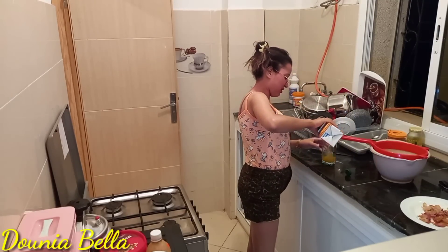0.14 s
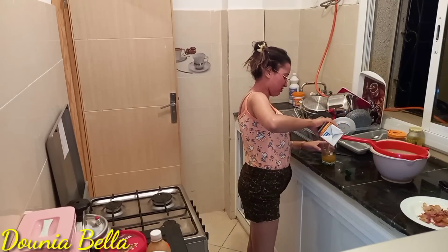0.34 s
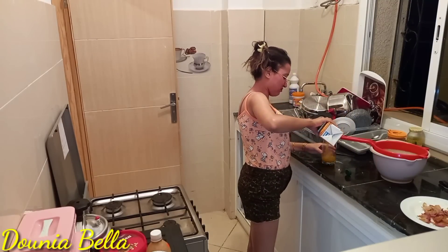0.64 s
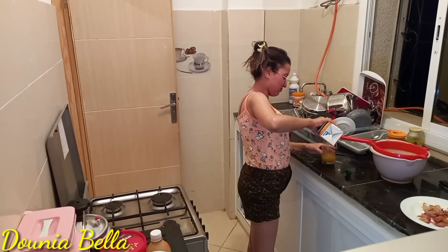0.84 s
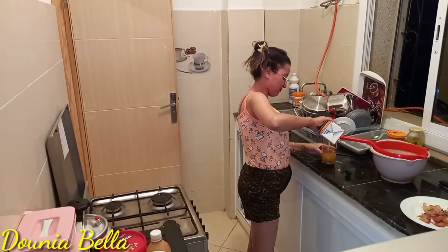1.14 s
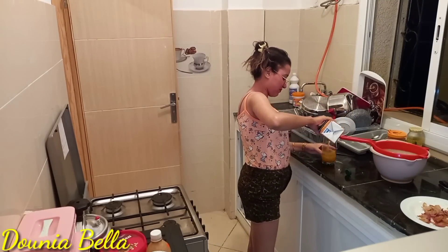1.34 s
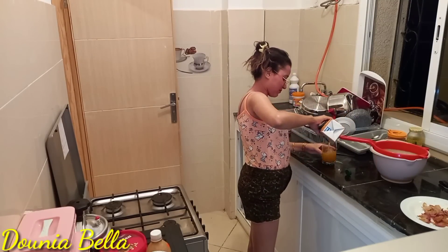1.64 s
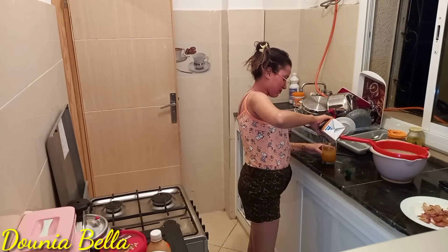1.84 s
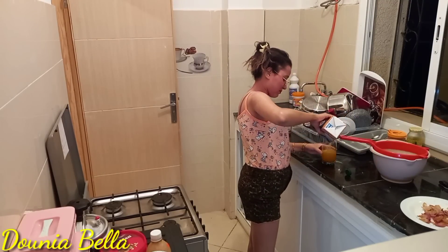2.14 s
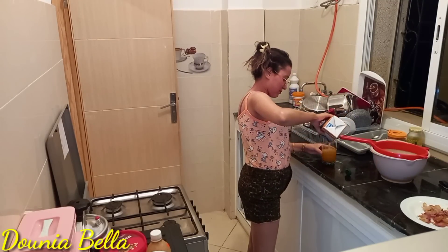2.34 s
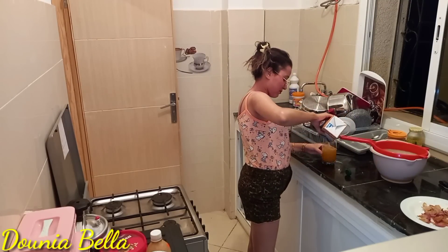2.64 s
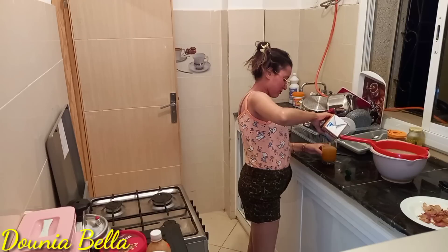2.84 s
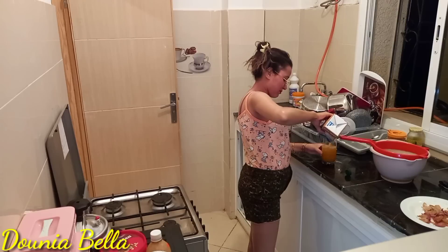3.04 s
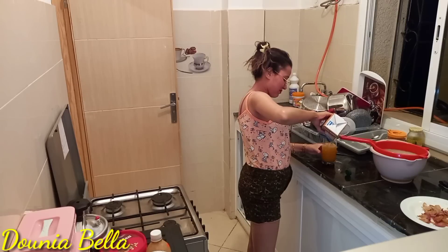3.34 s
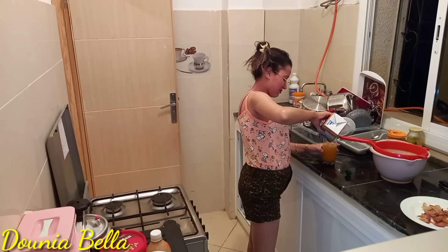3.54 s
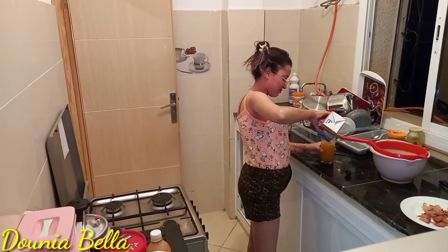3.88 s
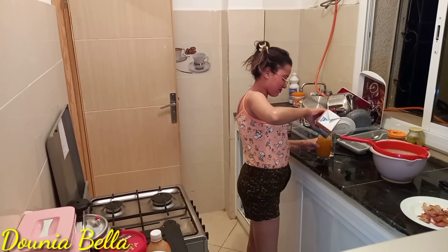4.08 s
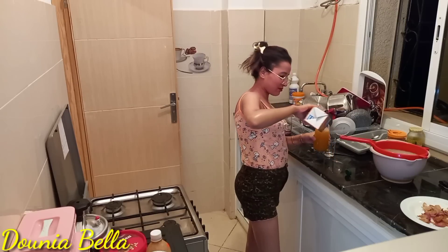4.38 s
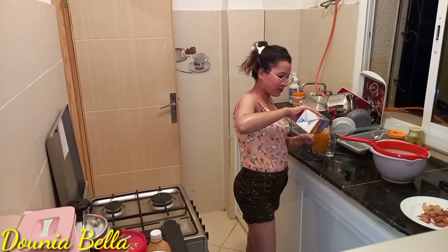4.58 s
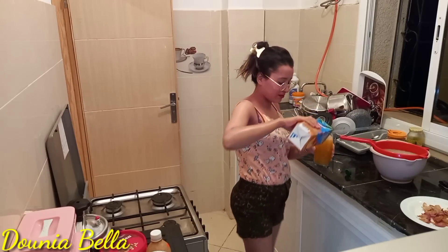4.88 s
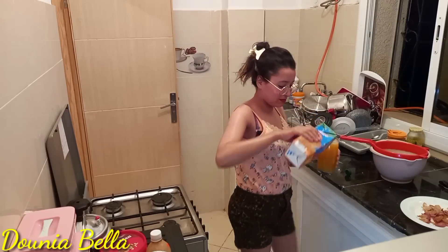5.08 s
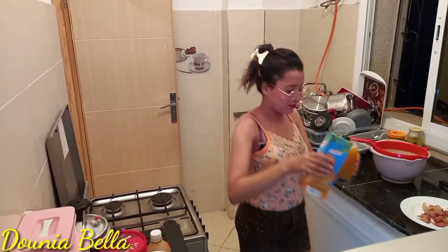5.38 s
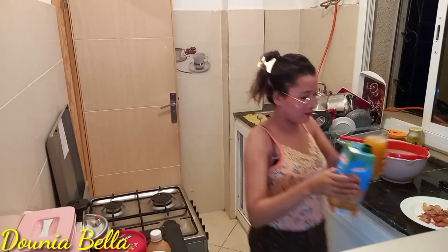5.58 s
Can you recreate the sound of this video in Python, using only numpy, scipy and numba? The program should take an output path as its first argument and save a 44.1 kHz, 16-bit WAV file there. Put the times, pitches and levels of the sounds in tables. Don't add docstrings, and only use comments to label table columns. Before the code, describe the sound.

Juice pours from a carton into a glass about two metres from a stereo microphone in a small tiled kitchen. Low hollow gulps, ringing glugs and bright bubbles tumble over fine splashing. The glass tone climbs as it fills; after about four seconds only stray plips, a slight carton creak and room hush with a faint fridge hum remain.

```python
import sys
import numpy as np
from scipy import signal
from scipy.fft import rfft, irfft, next_fast_len
from scipy.io import wavfile
from scipy.ndimage import uniform_filter1d
from numba import njit

SR = 44100
rng = np.random.default_rng(int(sys.argv[2]) if len(sys.argv) > 2 else 0)


def file_out(sig):
    cols = np.atleast_2d(sig).T
    lim = np.clip(cols, -1, 1)
    pcm = np.round(lim * 32767).astype(np.int16)
    wavfile.write(sys.argv[1], SR, pcm)


def how_loud(loudness_db):
    steps = np.asarray(loudness_db, float) / 20
    return 10 ** steps


N = 251976


def unit(x):
    return x / np.sqrt(np.mean(x ** 2))


def along_hz(table, hz):
    points, values = np.transpose(table)
    return np.interp(np.log(hz + 1), np.log(points + 1), values)


def level_db(table):
    s, db = np.transpose(table)
    return np.interp(np.arange(N) / SR, s, db)


def colour(x, gain_of_hz):
    size = next_fast_len(x.shape[-1], True)
    gain = gain_of_hz(np.fft.rfftfreq(size, 1 / SR))
    return irfft(rfft(x, size) * gain, size)[..., :x.shape[-1]]


def bell(f, hz, octaves):
    return np.exp(-(np.log2((f + 1) / hz) / octaves) ** 2)


def walk(rate_hz):
    k = int(SR / rate_hz)
    steps = np.repeat(rng.standard_normal(N // k + 1), k)
    return 1.3 * uniform_filter1d(uniform_filter1d(steps, k), k)[:N]


@njit
def ring(start_s, hz, cycles, size, glide, swell_cycles):
    out = np.zeros(N)
    for k in range(len(start_s)):
        period = SR / hz[k]
        length = cycles[k] * period
        first = int(start_s[k] * SR)
        phase = 0.
        for i in range(min(int(2 * length), N - first)):
            phase += 2 * np.pi * (1 + glide * i / length) / period
            rise = min(i / (swell_cycles * period), 1.)
            fade = np.exp(-3 * i / length)
            out[first + i] += size[k] * rise * rise * (3 - 2 * rise) * fade * np.sin(phase)
    return out


def bursts(table, length_s, spread, glide, fade_db, count, swell_cycles=3.06):
    s, db, hz, cycles = np.transpose(table)[:, :, None]
    late, detune, uneven = rng.random((len(table), 3, count)).transpose(1, 0, 2)
    follower = np.arange(count) > 0
    late = (np.arange(count) + late * follower) / count
    detune = (2 * detune - 1) * follower
    start_s = np.maximum(s + late * length_s - swell_cycles / hz, 0)
    size = how_loud(db + fade_db * late - 6.9 * uneven)
    grains = np.broadcast_arrays(start_s, hz * np.exp(spread * detune), np.maximum(cycles, 1), size)
    return ring(*(g.ravel() * 1. for g in grains), glide, swell_cycles * 1.)


# start in seconds, level in dB, pitch in Hz, ring in cycles.
GULPS = [(0.002, -36.5, 344, 6.7), (0.123, -37.5, 399, 18.7), (1.519, -34, 407.6, 20),
         (1.745, -33.5, 390, 4.45), (1.985, -39, 269, 4.9), (2.055, -31, 380, 2.4),
         (2.184, -41.5, 305, 3.9), (2.407, -37.5, 274, 5.5), (2.675, -29, 333, 9), (2.77, -39.5, 363, 4.3),
         (3.64, -45, 436, 4.7), (3.978, -52, 315, 9.6), (4.704, -53.5, 394, 8.1), (5.093, -47, 310, 3.7)]


def gulps():
    return bursts(GULPS, length_s=.042, spread=0.065, glide=0.015, fade_db=0.5, count=3)


# start in seconds, level in dB, pitch in Hz, ring in cycles.
COLUMN_EARLY = [
    (0.209, -60, 608, 37),
    (0.406, -36.5, 597, 13),
    (0.438, -50, 570, 12),
    (0.808, -32.5, 535, 12.5),
    (0.846, -25, 540, 4.4),
    (1.299, -38, 554, 11.6),
    (1.322, -32.5, 650, 8.4),
    (1.592, -34.5, 488, 6),
]
# start in seconds, level in dB, pitch in Hz, ring in cycles.
COLUMN = [(0.002, -31, 720, 3.5), (0.209, -43, 1130, 9.3), (0.498, -40.5, 1140, 9.7),
          (0.545, -45, 1000, 9.3), (1.083, -47.5, 1025, 9), (1.258, -41.5, 866, 6.3),
          (1.292, -34.5, 1230, 6.8), (1.47, -38.5, 707, 15), (1.529, -28.5, 750, 6.9),
          (1.74, -44, 715, 10.3), (2.091, -39, 760, 4.2), (2.186, -33.5, 907, 9), (2.39, -34, 1040, 5.4),
          (2.427, -39, 866, 10.4), (2.559, -42.5, 1150, 7.2), (2.67, -36.5, 846, 16),
          (2.843, -38.5, 983, 11.7), (2.932, -48.5, 990, 10), (3.092, -43, 1037, 18),
          (3.143, -22, 1070, 3.1), (3.314, -42.5, 1136, 19), (1.335, -40.5, 930, 9),
          (3.574, -39.5, 1114, 11), (3.634, -29.5, 1310, 3.7), (3.708, -37, 1090, 6.2),
          (3.985, -43, 1310, 12.5)]


def air_column():
    return (bursts(COLUMN_EARLY, length_s=0.054, spread=0.06, glide=0.011, fade_db=-13.5, count=5)
            + bursts(COLUMN, length_s=.049, spread=0.12, glide=0.014, fade_db=-14.5, count=5))


# top of the swell in seconds, level in dB, pitch in Hz, ring in cycles.
SWELLS = [
    (0.417, -26.5, 603, 19.3),
    (0.452, -20, 606, 15),
    (4.0, -41, 328, 12.7),
    (4.40, -61, 216, 56),
]


def swells():
    return bursts(SWELLS, length_s=1, spread=0, glide=0, fade_db=0, count=1, swell_cycles=12)


# start in seconds, level in dB, pitch in Hz, ring in cycles.
THUDS = [
    (1.532, -40.5, 233, 4),
    (2.683, -35, 246, 5.7),
    (2.779, -48, 137, 2.8),
    (0.0606, -44.5, 123, 4.1),
    (5.148, -50, 139, 4.2),
]


def thuds():
    return bursts(THUDS, length_s=0.0509, spread=0.22, glide=0.016, fade_db=-9.0, count=3)


# start in seconds, level in dB, pitch in Hz, ring in cycles.
BUBBLES_LOW = [(0.2295, -42.5, 1580, 10), (1.074, -30, 2185, 19), (1.1159, -33.5, 2090, 10.5),
               (1.292, -28.5, 1980, 8.5), (1.3288, -44, 1860, 21), (1.7956, -43, 1480, 6.4),
               (3.0809, -52, 2160, 16), (3.978, -45.5, 1567, 16), (4.06, -37.5, 1850, 4.8),
               (4.223, -42.5, 1540, 6.2), (4.6593, -50, 1590, 7.7), (5.4128, -59, 1530, 14)]
# start in seconds, level in dB, pitch in Hz, ring in cycles.
BUBBLES = [(0.1007, -43, 1970, 11), (0.205, -29.5, 1900, 16), (0.4519, -37, 2200, 10),
           (0.455, -33.5, 3070, 14), (0.645, -31, 1970, 9), (0.9278, -40, 2550, 10),
           (1.072, -29.5, 2750, 15.4), (1.5329, -30, 2340, 5.8), (1.6494, -37.5, 2040, 6.8),
           (1.9914, -39, 2800, 13.5), (2.195, -42, 2270, 13.5), (2.388, -41.5, 2480, 12),
           (2.5636, -50, 2830, 42), (2.6698, -33, 2800, 13), (2.8659, -44.5, 2830, 28),
           (3.393, -46.5, 2600, 21), (3.7439, -43, 3060, 15), (4.1265, -41.5, 3070, 14),
           (0.325, -30.5, 2850, 6), (4.03, -51, 2900, 15), (4.19, -43, 2290, 9)]
# start in seconds, level in dB, pitch in Hz, ring in cycles.
TINY = [(0.32, -44, 7100, 42), (1.5324, -42, 4430, 14), (1.7421, -42, 3730, 24), (1.9845, -44, 4780, 17),
        (2.074, -48, 3770, 12), (2.5905, -50, 3940, 22), (2.6734, -39, 4640, 13), (0.26, -45, 2980, 11),
        (3.3357, -38.5, 4320, 6.8), (3.5603, -43, 4620, 20), (3.749, -46.5, 4250, 12),
        (3.885, -48, 4000, 11), (3.9444, -55, 3400, 16), (1.742, -43.5, 7280, 35)]


def trapped_bubbles():
    return (bursts(BUBBLES_LOW, length_s=.049, spread=0.056, glide=0.014, fade_db=-32, count=8)
            + bursts(BUBBLES, length_s=.046, spread=0.082, glide=0.011, fade_db=-21.0, count=8)
            + bursts(TINY, length_s=.036, spread=0.073, glide=0.028, fade_db=-15.5, count=8))


# start in seconds, level in dB, pitch in Hz, ring in cycles.
LONE = [(0.165, -41, 400, 8.2), (0.225, -46, 2200, 6.9), (0.415, -31, 580, 9.5), (0.474, -41, 630, 7.1),
        (0.525, -53, 1140, 7.3), (0.548, -39.5, 2090, 14), (0.655, -42, 2140, 6.8), (0.668, -43, 1690, 7.9),
        (0.812, -47, 2690, 17), (0.842, -41.5, 2800, 21), (0.83, -24.5, 620, 8.9), (1.113, -40, 1055, 8.8),
        (1.205, -51, 3660, 27), (1.257, -43, 2700, 20), (1.305, -28.5, 668, 6.3), (1.347, -33.5, 560, 7.6),
        (1.39, -49, 1930, 15), (1.40, -41, 710, 8.9), (1.472, -47.5, 2700, 16), (1.495, -32, 857, 6.4),
        (1.55, -29.5, 413, 16), (2.205, -33.5, 1060, 7.3), (2.218, -32.5, 895, 7.3), (2.262, -41, 2840, 20),
        (2.27, -49, 970, 8), (2.43, -33.5, 2650, 11), (2.455, -48.5, 840, 8.6), (2.48, -46.5, 840, 13),
        (2.703, -35, 853, 28), (2.75, -38, 340, 6.7), (2.755, -45, 1050, 10), (2.79, -45, 840, 6.4),
        (2.90, -52, 440, 5.2), (3.134, -35, 990, 15.4), (3.148, -43.5, 2060, 18), (3.177, -41, 940, 9.9),
        (3.194, -59, 955, 7.2), (3.335, -40, 1080, 8), (3.357, -40, 1084, 13.5), (3.575, -34, 1070, 5.6),
        (3.8917, -54, 3750, 20), (3.9516, -45, 3420, 22), (3.987, -42.5, 4230, 12),
        (4.065, -46.5, 3070, 22), (4.15, -49, 2600, 12), (4.165, -47, 3050, 22), (4.195, -54, 3100, 26),
        (4.215, -48, 1540, 13), (4.24, -53, 2800, 14), (4.436, -45, 3820, 14)]
# start in seconds, level in dB, pitch in Hz, ring
STRAYS = [(0.004, -47.5, 1064, 23), (0.012, -33.5, 340, 12), (0.05, -40, 2920, 23),
          (0.098, -40.5, 2090, 13), (0.37, -35, 3260, 9.1), (1.113, -36, 2740, 16), (0.845, -28, 610, 4.8),
          (0.86, -43, 560, 7), (1.09, -34, 2180, 11), (1.122, -34.5, 2270, 10), (1.865, -48, 805, 6.4),
          (1.91, -56, 780, 9.7), (1.995, -41.5, 311, 7.9), (2.0, -48, 780, 6.7), (2.05, -53, 940, 8),
          (2.0765, -38.5, 3720, 22), (2.12, -43, 920, 5.6), (2.74, -36.5, 341, 20.6),
          (2.81, -40.5, 352, 9.8), (2.855, -51, 350, 8.1), (3.32, -39, 1037, 14), (3.38, -49, 1110, 17),
          (3.40, -59, 1085, 7.5), (3.65, -44, 1000, 12), (3.77, -47, 1200, 11), (4.85, -68, 402, 3.9),
          (5.115, -44.5, 980, 4), (5.2, -54, 300, 3.6), (5.46, -49.5, 2210, 17), (5.68, -47, 2570, 8.7),
          (1.312, -34.5, 568, 10.5), (1.375, -38, 568, 5.7), (1.405, -41, 600, 6.6), (0.76, -51, 9530, 36),
          (2.72, -40, 633, 6), (2.73, -40, 760, 9.4)]


def single_bubbles():
    return (bursts(LONE, length_s=.01, spread=.02, glide=0.031, fade_db=-6, count=1)
            + bursts(STRAYS, length_s=.01, spread=.02, glide=0.0069, fade_db=-6, count=1))


# start in seconds, level in dB, start pitch in Hz, ring in cycles.
CHIRPS = [
    (1.287, -37, 1250, 11),
    (1.295, -38, 1190, 16),
    (1.303, -41, 1780, 22),
    (1.318, -51, 1400, 16),
    (1.335, -39, 1090, 9.5),
    (1.352, -55, 1300, 15),
    (0.455, -43, 2700, 19),
]


def chirps():
    return bursts(CHIRPS, length_s=.01, spread=.02, glide=0.41, fade_db=-6, count=1)


# start in seconds, level in dB, pitch in Hz, ring in cycles.
FROTH = [
    (.812, -33, 648, 9.8),
    (1.53, -29, 510, 8.5),
    (2.68, -29.5, 510, 4.1),
    (5.10, -42.5, 610, 3.1),
    (5.41, -43.5, 1070, 4.6),
]


def froth_and_creaks():
    return bursts(FROTH, length_s=.06, spread=0.307, glide=0.013, fade_db=-22.0, count=5)


# start in seconds, level in dB, pitch in Hz, ring in cycles.
SLOSHES = [(0.05, -47, 360, 11), (0.19, -40, 394, 15), (0.48, -47, 377, 5.2), (1.16, -48.5, 835, 6.1),
           (1.88, -48, 820, 4.5), (2.2, -45, 480, 4.9), (2.44, -37.5, 418, 4.4), (2.83, -41, 384, 3.5),
           (3.12, -37, 468, 3.6), (3.7, -49.5, 270, 6), (5.44, -38, 2090, 4.1), (5.46, -52.5, 320, 4),
           (2.69, -37, 294, 4.2)]


def sloshes():
    return bursts(SLOSHES, length_s=0.055, spread=0.12, glide=0.018, fade_db=-6.0, count=4)


# start in seconds, peak in dB, pitch in Hz.
TICKS = [(0.317, -40, 7230), (0.6325, -38, 4620), (0.7577, -55, 9400), (0.7886, -42, 4500),
         (0.8937, -35, 4600), (1.048, -42, 5250), (1.072, -28.5, 4220), (1.2565, -43, 9100),
         (1.476, -45, 4090), (1.523, -40, 9600), (1.5476, -32, 4600), (1.7384, -36, 7090),
         (1.967, -39, 4330), (1.982, -31, 7170), (2.068, -39, 4020), (2.1869, -47, 12900),
         (2.391, -39, 4580), (2.5905, -52, 4050), (2.613, -64, 4020), (2.672, -30, 5200),
         (2.6748, -38, 4540), (2.8707, -36, 4580), (2.8942, -32, 7460), (3.1062, -34, 8000),
         (3.334, -39.5, 4480), (3.4655, -48, 6200), (3.5618, -52, 4730), (3.7569, -53, 4560),
         (3.7569, -43, 4200), (3.985, -42, 4030), (4.371, -50.5, 10000), (4.437, -45, 4070)]


def ticks():
    s, db, hz = np.transpose(TICKS)
    table = np.transpose([s, db + 2.5, hz, np.full(len(s), 6)])
    return bursts(table, length_s=.012, spread=.22, glide=.1, fade_db=-10, count=4)


# time in seconds, level in dB.
STREAM = [(0.0, -36), (0.5, -43), (0.9, -41), (1.7, -40), (2.4, -50), (2.77, -43.5), (3.6, -48.5),
          (4.15, -50.5), (5.71, -46.5)]
# start in seconds, level in dB, top end and low end against it in dB.
SPLASHES = [(0.0024, -37.5, -4, 3), (0.0594, -33.5, -8, -15), (0.318, -38, 1.5, -6.5),
            (0.4324, -35.5, -3.5, 1.5), (0.5194, -35.5, -2, -0.5), (0.634, -38.5, 0, -1),
            (0.762, -36.5, -3.5, -4.5), (0.205, -46, -14, 7), (1.048, -50.5, 5, -32),
            (1.0715, -39.5, -2, -9), (1.26, -37.5, -1, 0), (1.29, -32.5, -9, -6), (1.524, -32, -8, -4),
            (1.7415, -39, -3, -2.5), (1.972, -37, -9.5, -12), (2.0682, -37.5, -7.5, -7),
            (2.188, -35.5, -3.5, -3), (2.394, -39.5, -5.5, -1.5), (2.6674, -31.5, -6, -1),
            (2.765, -39.5, 0.5, 1), (2.887, -43.5, -1, -3), (3.107, -38.5, -5.5, 0.5), (3.563, -41, -1, -2),
            (3.743, -44.5, -3.5, 6), (3.987, -43, -7.5, 3.5), (4.138, -42.5, -7, 1), (4.432, -38, -5, -12),
            (4.6989, -51, -1, 7), (5.0994, -51, -5, -0.5), (5.405, -48.5, -2, -3)]
# frequency in Hz, density in dB per Hz.
SPRAY = [(290, -60), (500, 11.5), (850, -14), (1200, -13.5), (1620, -6.5), (1880, -9.5), (2100, -7),
         (5590, -11), (7030, -9), (8850, -6), (10800, -4.5), (15500, -9.5)]
# frequency in Hz, left minus right in dB.
EARS = [(60, -8), (110, 23), (200, 3), (380, -1), (560, -3.5), (800, 1), (1290, -3), (2380, 1), (4400, -1),
        (8120, -3), (15000, 41)]


def spray():
    t = np.arange(N) / SR
    count, rise_s, fade_s = 40000, 0.0023, 0.1
    hz = 1000 * 14 ** rng.random(count)
    start_s = rng.random(count) * t[-1]
    size = how_loud(1.2 * np.minimum(rng.exponential(size=count), 4.5))
    fizz = ring(start_s, hz, np.full(count, 24.), size, 0.075, 2.4)
    fizz = unit(colour(fizz, lambda f: np.sqrt(f + 300)))
    fizz = np.array([fizz, np.roll(fizz, SR)]) + 0.81 * rng.standard_normal((2, N))

    trickle = how_loud(level_db(STREAM) - 10.0)
    power = np.array([trickle * how_loud(db) for db in (-3, 0, -5)]) ** 2
    for s, db, top_db, low_db in SPLASHES:
        first = max(int((s - .007) * SR), 0)
        span = slice(first, first + SR // 2)
        age = t[span] - t[first]
        fall = 0.5 * np.exp(-age / 0.0047) + 0.79 * np.exp(-(age / fade_s) ** 2) + 0.29 * np.exp(-age / 0.15)
        swell = (1 - np.exp(-age / rise_s)) ** 2 * fall
        zone_db = np.array([[low_db + 0.5], [0], [top_db]])
        power[:, span] += (swell * how_loud(db - 6.0 + zone_db)) ** 2

    out = 0
    for hz in 700 * 2 ** np.arange(0, 4.7, 1 / 3):
        band = colour(fizz, lambda f: how_loud(along_hz(SPRAY, f)) * bell(f, hz, .2))
        zone = int(hz > 3500) + int(hz > 8000)
        side = how_loud(min(along_hz(EARS, hz), 5.5) * np.array([[.5], [-.5]]))
        patchy = how_loud(2.2 * walk(9) + 1.8 * walk(30))
        out = out + band * side * np.sqrt(power[zone]) * patchy
    return out * how_loud(5)


def blips():
    pour_ends_s = 4.3
    when, size, uneven = rng.random((260, 3)).T
    s = when * pour_ends_s
    db = level_db(STREAM)[(s * SR).astype(int)] - 5.5 - 9 * uneven
    return ring(s, 2100 * 2.56 ** size, np.full(len(s), 12.), how_loud(db), 0.17, 4.0)


# frequency in Hz, level in dB, left minus right in dB.
WALL_MODES = [(169, 14.5, -5), (271.7, 0.5, -8), (318, 2.5, 3), (334.1, 4.5, 6.5), (390.3, 2, -2),
              (409, 2, 4), (460.3, -5, 8), (510, -1.5, -7), (556, -3.5, -1), (608, 0.5, -5), (681, -3, 0),
              (726, -3.5, -8), (580, -3.5, -13), (654, 6.5, 1.5), (864, -21, -9), (920, -0.5, -9),
              (927, 6, 11), (1025, 3, 11), (1064, 2.5, 20), (1082, -2.5, -17), (1230, -15, 17),
              (1567, 12.5, 9), (1840, -8, -7), (2172, 12, 0.5), (2190, -11, -6), (2420, -6, -2),
              (2750, 8.5, 14)]
# frequency in Hz, t60 in seconds.
TAIL = [(200, 0.041), (800, 0.56), (2500, 0.84), (6000, 0.6), (14000, 0.12)]


def kitchen():
    tail_db, modes_db, direct_db, early_db = 1, -4, 0.5, 11
    early_t60_s, mode_t60_s, first_echo_s = 0.11, .33, 0.0026
    diffuse_hz, modes_shorten_hz, port_lag_samples = 780, 1100, 12
    t = np.arange(SR) / SR
    tail = 0
    for hz in 100 * 2 ** np.arange(0, 7.6, .5):
        band = colour(rng.standard_normal((2, SR)), lambda f: bell(f, hz, .3))
        t60_s = along_hz(TAIL, hz)
        dense = min(hz / diffuse_hz, 1)
        decay = how_loud(-60 * t / t60_s) + how_loud(early_db - 60 * t / early_t60_s)
        tail = tail + dense * band * decay / np.sqrt(t60_s * SR / 14)

    modes = 0
    for (hz, db, pan_db), phase in zip(WALL_MODES, rng.random((len(WALL_MODES), 2, 1))):
        turn = np.pi * (phase[0] + min(hz / 500, 1) * (phase - phase[0]))
        port_db = db + pan_db * np.array([[.5], [-.5]])
        decay_db = 60 * t / mode_t60_s * max(hz / modes_shorten_hz, 1)
        modes = modes + how_loud(port_db - decay_db) * np.sin(2 * np.pi * hz * t + turn)

    response = how_loud(tail_db) * tail + how_loud(modes_db) * modes / 300
    response = response * np.clip(t / first_echo_s - 1, 0, 1)
    response[[0, 1], [port_lag_samples, 0]] += how_loud(direct_db)
    return colour(response, lambda f: how_loud(np.outer([.5, -.5], along_hz(EARS, f))))


# time in seconds, level in dB.
FRIDGE = [(0, -68.5), (2.3, -67), (2.7, -61), (3.6, -75), (4.2, -59), (4.75, -74.5), (5.27, -53),
          (5.5, -72), (5.71, -70)]


def fridge():
    hz = 100.9 * (1 + .02 * walk(15) + 0.03 * walk(4))
    phase = 2 * np.pi * np.cumsum(hz) / SR
    hum = np.sin(phase) + how_loud(-17.0 + 1.4 * walk(0.36)) * np.sin(2 * phase)
    return np.sqrt(2) * how_loud(level_db(FRIDGE) + 2.2 * walk(25)) * hum * how_loud([[.8], [-.8]])


# frequency in Hz, density in dB per Hz.
HUSH = [(15, -44), (25, -4.5), (91, 1), (240, -10), (410, -3.5), (600, -19), (930, -13.5), (1220, -18.5),
        (1570, -7), (2170, -24), (2770, -10.5), (4260, -9.5), (5880, -18.5), (10100, -20), (13900, -32.5),
        (15500, -27)]
# frequency in Hz, left-right likeness from -1 to 1.
LIKENESS = [(60, 0.2), (130, 0.74), (290, 0.69), (640, 0.37), (1410, -0.094), (3100, -0.1), (6820, -0.032),
            (15000, 0.49)]


def hush():
    out, swell = 0, walk(1.0)
    for hz in 28 * 2 ** np.arange(0, 9.6, .5):
        alike = np.clip(along_hz(LIKENESS, hz), -.9, .95)
        noise = rng.standard_normal((2, N))
        mid, side = colour(noise, lambda f: how_loud(along_hz(HUSH, f)) * bell(f, hz, .3))
        pair = np.sqrt(1 + alike) * mid + np.sqrt(1 - alike) * side * np.array([[1], [-1]])
        out = out + how_loud(.6 * swell + 1.4 * walk(7)) * pair
    return unit(out) * how_loud(-55.5)


def scene():
    pour = gulps() + air_column() + swells() + thuds() + trapped_bubbles() + single_bubbles()
    pour = pour + chirps() + froth_and_creaks() + sloshes() + ticks() + blips()
    in_room = signal.fftconvolve(pour[None] * how_loud(10), kitchen(), axes=1)[:, :N]
    return in_room + spray() + fridge() + hush()


def band_limit(x):
    return signal.sosfilt(signal.butter(12, 16290, fs=SR, output="sos"), x)


def record(dry):
    low_hz, top_hz = 46.3, 15650
    heard = colour(dry, lambda f: (f < top_hz) / np.sqrt(1 + (low_hz / (f + 1)) ** 6))
    return band_limit(heard)


dry = scene()
out = record(dry)
file_out(out)
```